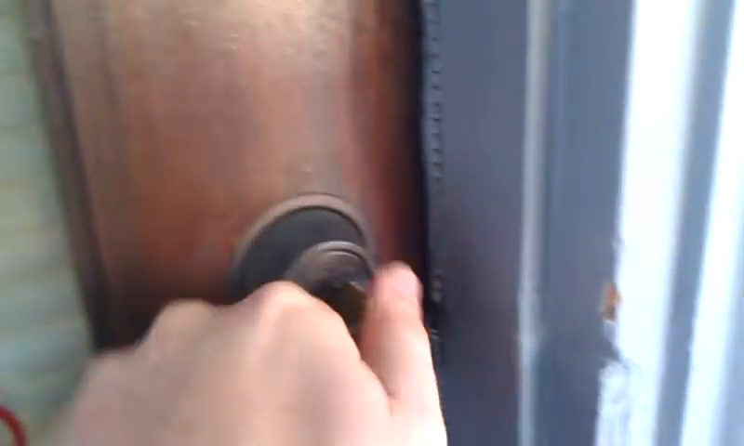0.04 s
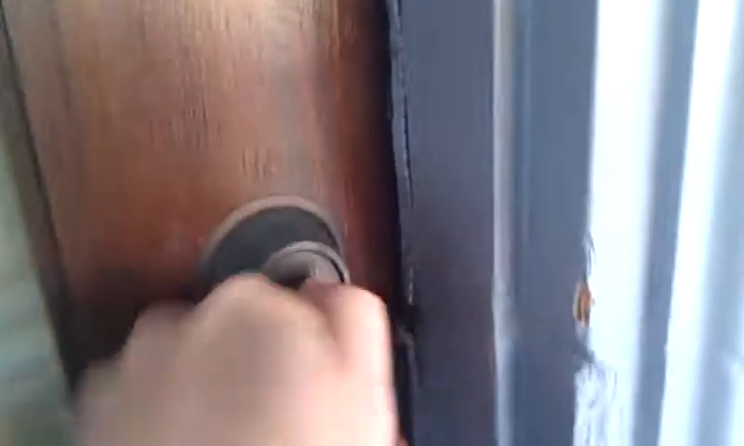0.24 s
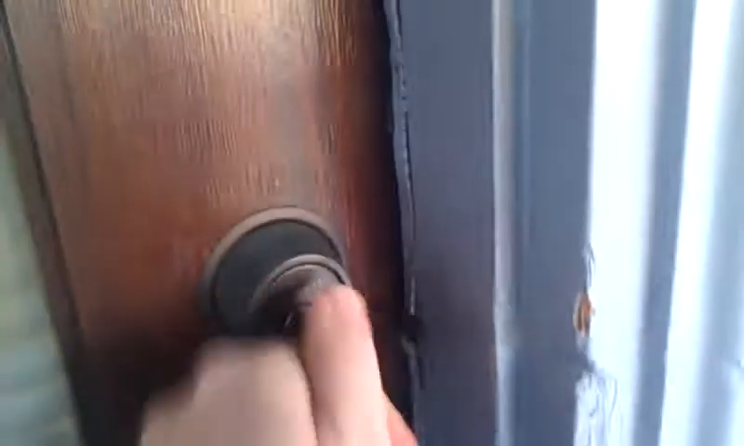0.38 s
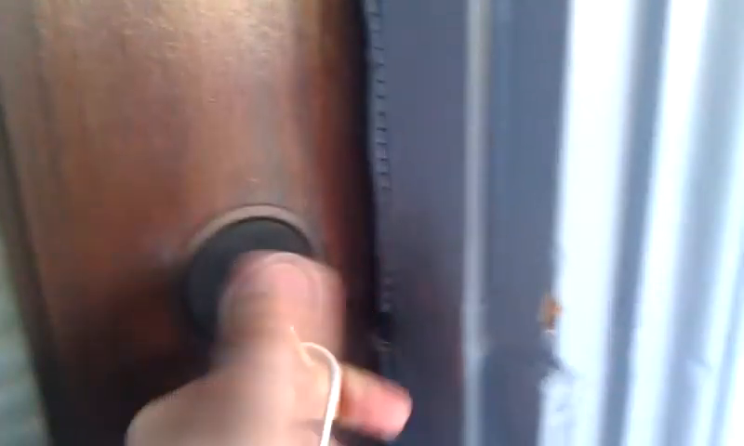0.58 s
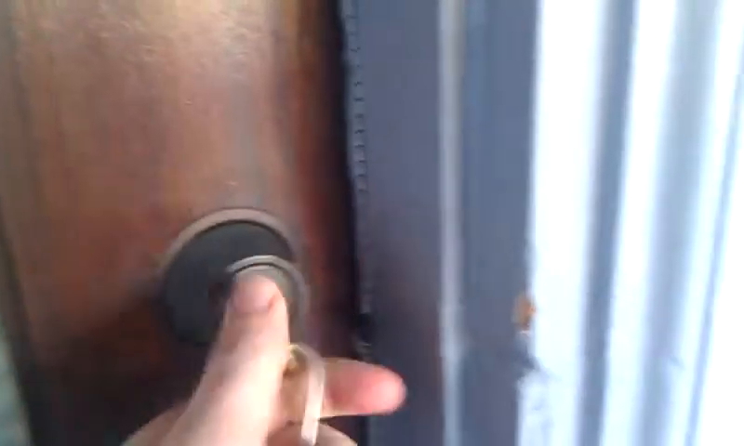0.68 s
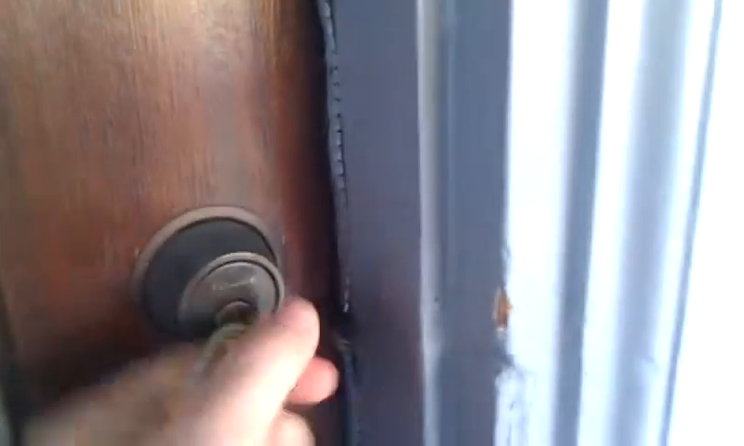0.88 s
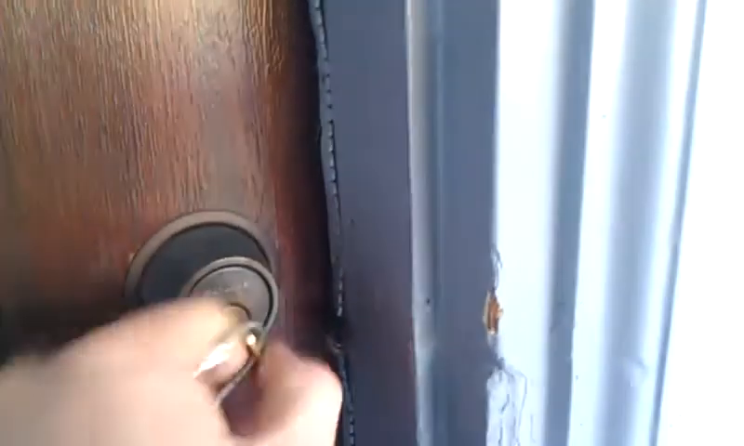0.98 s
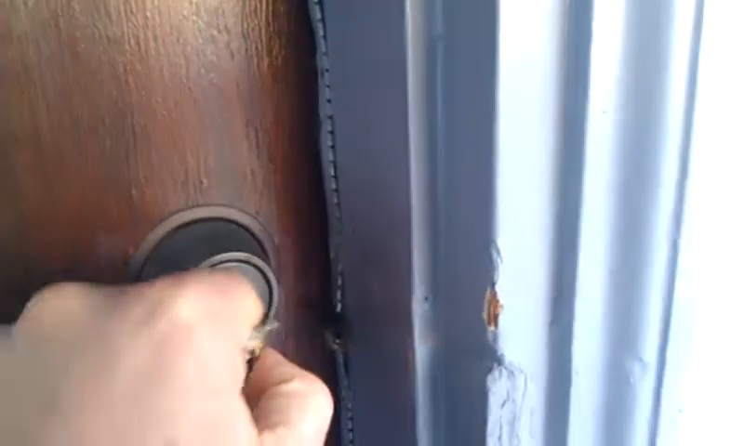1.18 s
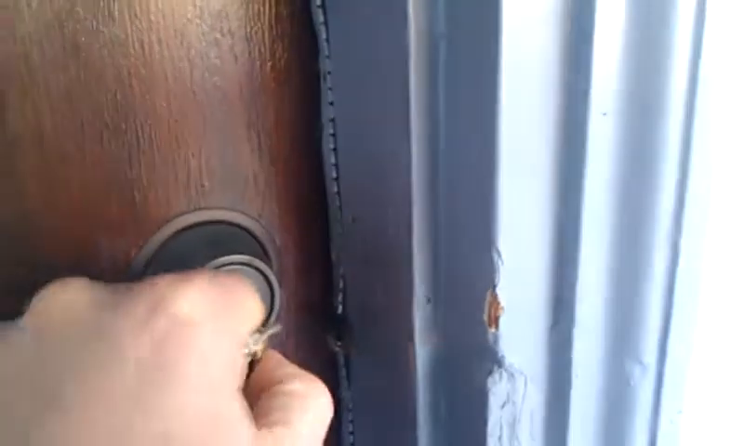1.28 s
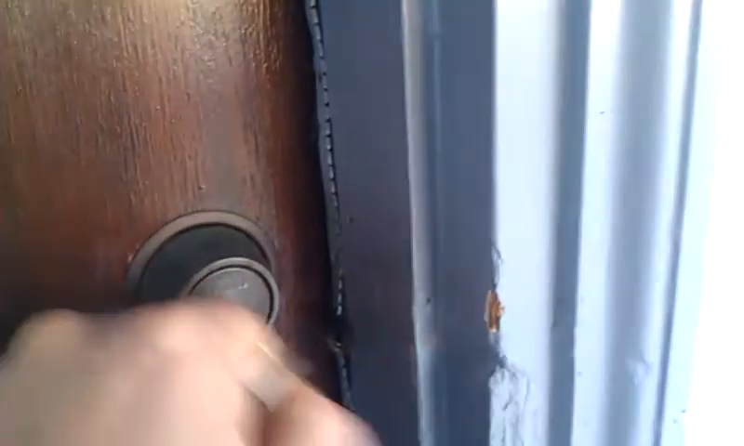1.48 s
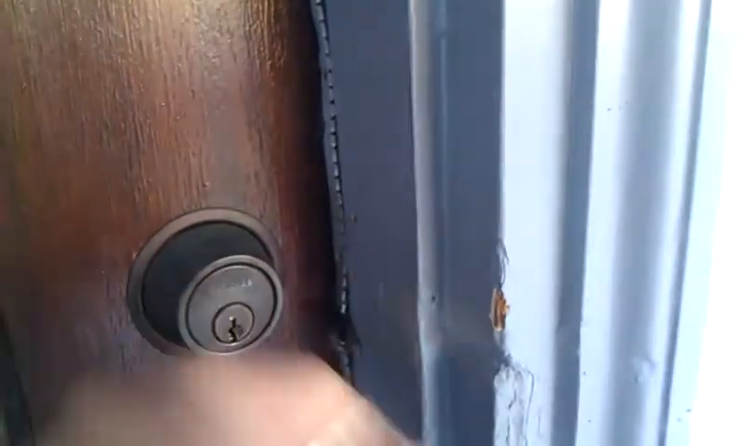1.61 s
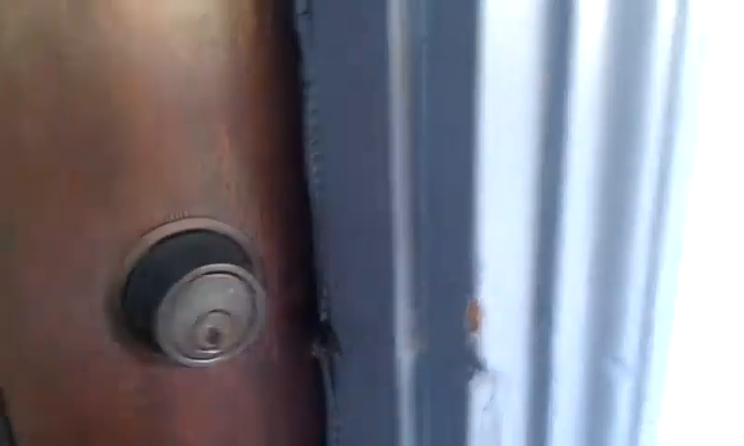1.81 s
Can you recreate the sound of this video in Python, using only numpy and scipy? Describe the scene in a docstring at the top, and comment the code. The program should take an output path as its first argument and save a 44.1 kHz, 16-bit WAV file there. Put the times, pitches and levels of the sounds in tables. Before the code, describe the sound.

A key works a deadbolt in a wooden door, heard close on a phone microphone. Faint rubbing and low rumble lead to a loud bright clack at 0.23 s, with a smaller click at 0.28. Lighter clicks and a soft thud follow at 0.5 and 0.74, then quiet fumbling. At 1.5-1.58 the key scrapes out in rapid metallic ticks; the door thuds softly and keys jingle from 1.75, brightest at the end.

```python
"""Low rumble, the hush of an entrance and faint rubbing come first; then a key is turned in a deadbolt in a
wooden door, turned back and pulled out, close to a phone microphone. Each contact is a short chatter of clicks
that rings the modes of lock, key and door; the pins drop as the key leaves, its blade scrapes out as dense
grains, the keys on the ring jingle and the door thuds softly in its frame. Rumble and hush are banded noise;
allpasses and feedback delays make the room."""
import sys
import numpy as np
from scipy import signal
from scipy.io import wavfile

SR = 44100
rng = np.random.default_rng(int(sys.argv[2]) if len(sys.argv) > 2 else 0)


def nominal_scale(level):
    """Amplitude ratio for a level in decibels (scalar or array-like)."""
    x = np.asarray(level, float) / 20
    return 10 ** x


def log_audio(samples):
    """Write samples as a 16-bit WAV file to the path given in sys.argv[1]."""
    # one column per channel
    frames = np.atleast_2d(samples).T
    # limit to full scale, then quantise
    limited = np.clip(frames, -1, 1)
    pcm = np.round(limited * 32767).astype(np.int16)
    wavfile.write(sys.argv[1], SR, pcm)


N = 81585  # length in samples


def rms_one(x):
    """Scales a signal to rms 1."""
    return x / np.sqrt(np.mean(x ** 2) + 1e-20)


def level(rows):
    """A curve of (s, dB) as gain: silent before it, and after it unless it runs past 1.8 s."""
    s, db = np.transpose(rows)
    after_db = db[-1] if s[-1] > 1.8 else -200
    return nominal_scale(np.interp(np.arange(N) / SR, s, db, left=-200, right=after_db))


def drift(rate):
    """Slow chance of spread 1: noise through two equal one-pole low-passes at rate Hz."""
    every = 40  # samples between drawn points
    pole = np.exp(-2 * np.pi * rate * every / SR)
    noise = rng.standard_normal(N // every + 2002)
    slow = signal.lfilter([1], [1, -2 * pole, pole ** 2], noise)[2000:]
    return np.interp(np.arange(N) / every, np.arange(len(slow)), rms_one(slow))


def banded_noise(spectrum, patchy_db, rate):
    """Third-octave bands of noise that flicker twice as much together as each alone; rms 1."""
    hz, db = np.transpose(spectrum)
    edges = 20 * 2 ** np.arange(0, 9.8, 1 / 3)
    white = rng.standard_normal((2, N + 8000))  # neighbouring bands take different noise
    together = drift(rate)
    out = 0
    for k, (low, high) in enumerate(zip(edges, edges[1:])):
        mid = np.sqrt(low * high)
        if hz[0] < mid < hz[-1]:
            band_pass = signal.butter(2, [low, high], "band", fs=SR, output="sos")
            band = signal.sosfilt(band_pass, white[k % 2])[8000:]
            flicker_db = patchy_db * (2 * together + drift(rate))
            out = out + band * nominal_scale(np.interp(np.log(mid), np.log(hz), db) + flicker_db)
    return rms_one(out)


def ring(clicks, hz, t60):
    """A damped resonator: a unit click sets a sine of height 1 ringing, for at least 2 ms to -60 dB."""
    r = nominal_scale(-60 / (max(t60, .002) * SR))
    w = 2 * np.pi * hz / SR
    return signal.lfilter([0, np.sin(w)], [1, -2 * r * np.cos(w), r * r], clicks + 1e-18)


def strike(modes, s, db, favour_hz=None, width_oct=1., scatter_db=4, most_db=12, lag_cycles=0):
    """Every click rings every mode at its own strength, less those far from the favoured pitch."""
    out = np.zeros(N)
    for k, (hz, mode_db, t60) in enumerate(modes):
        at = np.clip(((s + lag_cycles / hz) * SR).astype(int), 0, N - 1).ravel()
        own_db = scatter_db * rng.standard_normal(s.shape)
        if favour_hz is not None:
            octaves_off = np.log2(hz / favour_hz)
            own_db = own_db - np.minimum(6 * (octaves_off / width_oct) ** 2, most_db)
        sign = rng.choice([-1, 1], s.shape)
        sign[:, 0] = (-1) ** k  # the first click alternates in sign from mode to mode
        heights = nominal_scale(db + mode_db + own_db) * sign
        out += ring(np.bincount(at, heights.ravel(), N), hz, t60)
    return out


def grains(modes, per_s):
    """Friction as dense uneven clicks, each dealt to one mode by chance; rms 1."""
    heights = nominal_scale(2.8 * np.minimum(rng.exponential(1, N), 5))
    happens = rng.random(N) < per_s / SR
    clicks = heights * rng.choice([-1, 1], N) * happens
    dealt = rng.integers(0, len(modes), N)
    out = np.zeros(N)
    for k, (hz, db, t60) in enumerate(modes):
        out += nominal_scale(db) * ring(clicks * (dealt == k), hz, t60)
    return rms_one(out)


def crowded(strength, count):
    """Modes (Hz, dB) spread evenly in pitch, slightly out of line."""
    hz, db = np.transpose(strength)
    crowd = np.geomspace(hz[0], hz[-1], count) * rng.uniform(.98, 1.02, count)
    return zip(crowd, np.interp(np.log(crowd), np.log(hz), db))


def bodies():
    """Modes (Hz, dB, t60 in s) of lock, key and door; the door's low modes ring longest."""
    # Modes of the lock. Each row: pitch in Hz, strength in dB.
    lock_modes = [(4550, -2.5), (4950, 3.5), (5230, 4), (5600, 3.5), (5950, 3.5), (6300, 1), (6650, 4),
                  (7000, 0.5), (7400, -0.5), (8200, -10.5), (8900, -13)]
    # Strength curve of the key's crowded modes. Each row: pitch in Hz, strength in dB.
    key_strength = [(9700, -15), (11800, -8), (13700, -5.5), (15500, -3.5)]
    # Strength curve of the door's crowded modes. Each row: pitch in Hz, strength in dB.
    door_strength = [(480, -17), (620, -7), (760, -17), (910, -7), (1060, -13), (1250, -3), (2400, -5),
                     (3100, -1), (4300, 0)]
    lock = [(hz, db, 0.021) for hz, db in lock_modes]
    key = [(hz, db, 0.0071) for hz, db in crowded(key_strength, count=12)]
    door = [(hz, db, 0.038 * np.sqrt(1000 / hz)) for hz, db in crowded(door_strength, count=26)]
    return lock, key, door


def rumble():
    """Low noise with a hum that wavers, since noise drives its resonator."""
    # Loudness of the rumble. Each row: time in seconds, level in dB.
    rumble_level = [(0, -63.5), (.21, -64), (.25, -48), (.39, -57.5), (.48, -59.5), (.53, -52.5),
                    (.73, -59.5), (.92, -59.5), (1.05, -55.5), (1.15, -58), (1.5, -61), (1.595, -39.5),
                    (1.67, -54), (1.73, -46), (1.82, -59), (1.85, -47)]
    # Spectrum of the rumble. Each row: frequency in Hz, relative density in dB per Hz.
    rumble_colour = [(13, -35), (22, -9.5), (65, 4), (178, -1.5), (237, -5.5), (500, -11), (650, -40)]
    hum = rms_one(ring(rng.standard_normal(N), hz=60.2, t60=0.066))
    noise = banded_noise(rumble_colour, patchy_db=1.52, rate=6.4)
    return level(rumble_level) * (noise + nominal_scale(-11.5) * hum)


def hush():
    """The soft wide noise of the entrance, rising and sinking."""
    # Loudness of the hush. Each row: time in seconds, level in dB.
    hush_level = [(0, -65), (.33, -56.5), (.48, -65.5), (.62, -65.5), (.82, -59), (1.19, -65), (1.42, -71),
                  (1.66, -58.5), (1.85, -56)]
    # Spectrum of the hush. Each row: frequency in Hz, relative density in dB per Hz.
    hush_colour = [(150, -37), (250, -2), (450, -9.5), (1000, -6.5), (2100, -10), (4050, -16),
                   (6200, -10.5), (9010, -25.5), (16000, -22)]
    return level(hush_level) * banded_noise(hush_colour, patchy_db=1.0, rate=10)


def entrance(x):
    """Three short allpasses smear the sound; ten feedback delays, duller on every round, prolong it."""
    t60_s, wall_cut_hz = 0.29, 10100
    for lag in (37, 89, 173):  # samples
        b = np.r_[-.65, np.zeros(lag - 1), 1]
        x = signal.lfilter(b, b[::-1], x + 1e-18)
    dull = np.exp(-2 * np.pi * wall_cut_hz / SR)
    lags = (rng.uniform(.004, .022, 10) * SR).astype(int)
    out = np.zeros(N)
    for k, lag in enumerate(lags):
        loop, state = x.copy(), [0.]
        gain = nominal_scale(-60 * lag / SR / t60_s)
        for i in range(lag, N, lag):
            back, state = signal.lfilter([gain * (1 - dull)], [1, -dull], loop[i - lag:i], zi=state)
            loop[i:i + lag] += back[:N - i]
        out += (loop - x) * (-1) ** k
    return out


def thuds():
    """The door shifts in its frame: a soft push rings three neighbouring low modes."""
    # Each row: time in seconds, push in dB before softening, pitch of the middle mode in Hz.
    shifts = [(0.511, -41, 318), (1.022, -45, 280), (1.584, -40.5, 150), (1.744, -43, 180)]
    out = np.zeros(N)
    for s, db, hz in shifts:
        push = np.zeros(N)
        push[int(s * SR)] = nominal_scale(db)
        t60 = 18.5 / hz  # 18.5 cycles of the middle mode
        for ratio, gain in ((.75, .5), (1, -1), (1.3, .8)):
            out += gain * ring(push, hz * ratio, t60)
    return signal.lfilter([.0036], [1, -1.88, .8836], out)  # two one-pole low-passes near 430 Hz


def rubbing(lock, door):
    """Fingers and key rub, faint and uneven: grains mostly low in the door, some in the lock."""
    # Fingers and key heard through the door. Each row: time in seconds, level in dB before the band-pass.
    rub_level = [(0, -55.5), (.05, -54.5), (.12, -71), (.19, -53), (.34, -57), (.72, -64.5), (.82, -52),
                 (.9, -66), (1.0, -54.5), (1.15, -66.5), (1.335, -67), (1.37, -51.5), (1.455, -53.5),
                 (1.49, -70), (1.6, -54.5), (1.85, -64)]
    # Edges of the dull band: low in Hz, high in Hz.
    rub_band = (570, 1407)
    per_s = 6000
    band_pass = signal.butter(2, rub_band, "band", fs=SR, output="sos")
    dull = signal.sosfilt(band_pass, grains(door, per_s))
    uneven = nominal_scale(drift(23))
    return level(rub_level) * uneven * (dull + nominal_scale(-10) * grains(lock, per_s))


def jingles(key, count=8):
    """Loose keys touch: a firm click and a run of faint ones ring long modes, with a dry rattle."""
    # Touches on the ring. Each row: start in seconds, level in dB, favoured pitch in Hz.
    touches = [(1.752, -61, 14915), (1.766, -60, 11120), (1.776, -57, 6815), (1.8015, -48, 11120),
               (1.811, -52, 7000), (1.8450, -27.5, 13800)]
    # Long modes of the loose keys. Each row: pitch in Hz, strength in dB, t60 in seconds.
    loose_keys = [(6815, 0, .11), (7530, -5, .08), (11120, 0, .1), (14915, 0, .14)]
    s, db, hz = np.transpose(touches)[:, :, None]
    faint = np.arange(count) > 0
    s = s + .022 * faint * rng.random((len(s), count))
    db = db - 11 * faint
    tones = strike(loose_keys, s, db, hz, width_oct=.3, scatter_db=2, most_db=24)
    rattle = strike(key, s, db - 12)
    return tones + rattle


def scrape(lock, key, door):
    """The key blade scrapes out past the pins: dense grains in lock, key and door."""
    # Loudness of the scrape in the lock. Each row: time in seconds, level in dB.
    scrape_level = [(1.498, -52), (1.506, -47.5), (1.525, -37), (1.545, -42.5), (1.575, -37), (1.59, -71),
                    (1.62, -60)]
    per_s = 4900
    mix = grains(lock, per_s)
    mix += nominal_scale(-6) * grains(key, per_s)
    mix += nominal_scale(-6.5) * grains(door, per_s)
    return level(scrape_level) * mix


def contacts(lock, key, door, count=24):
    """One firm click and a dying chatter of tiny ones; the door answers later. Returns lock, rest."""
    # Contacts of key, pins and bolt. Each row: start in seconds, level in dB before the offset of each body,
    # pitch the lock favours in Hz, key and door in dB over that level before theirs, chatter time in seconds.
    touches = [(0.1362, -39, 5930, -3.5, -8.5, 0.0011), (0.2006, -37.5, 6140, -15, -4.5, 0.0023),
               (0.225, -22.5, 5540, -6, -6, 0.0014), (0.2283, -14, 6020, -9, -8.5, 0.0019),
               (0.2317, -4, 5370, -14, -24.5, 0.0014), (.2380, -28, 6300, -3, 2.5, 0.0066),
               (0.2764, -19.5, 6430, -13.5, -17, 0.006), (0.503, -30, 4570, -28, -13.5, 0.0044),
               (0.65, -47, 6100, -7, -3, 0.0033), (0.7337, -36, 6160, -12.5, -13.5, 0.00064),
               (0.7447, -24, 6460, -18.5, -13, 0.004), (0.7555, -40, 5530, 3, -10, 0.0032),
               (1.0142, -36.5, 4710, -39.5, -9.5, 0.0034), (1.109, -45, 6000, -14.5, -9.5, 0.0024),
               (1.181, -44.5, 5700, -1, -6.5, 0.0026), (1.2178, -48, 6220, -10, -13, 0.0019),
               (1.248, -45.5, 5900, -8.5, -13.5, 0.0035), (1.2851, -46.5, 5930, -11, -13.5, .002),
               (1.345, -68, 6330, -22, 7, 0.0038), (1.367, -53.5, 6150, -30, -1, 0.0042),
               (1.385, -55, 6100, -3, -3, 0.0022), (1.4142, -32, 5930, -23, -16, .002),
               (1.4190, -40.5, 5000, -11, -12, .002), (1.4406, -43, 5200, -5.5, -13, 0.0014),
               (1.5083, -21, 6570, -4.5, -17, 0.00072), (1.5215, -23, 5520, 3, -21, 0.00099),
               (1.532, -26, 6980, 0, -17, 0.00091), (1.5392, -23.5, 6550, 5, -9.5, 0.0018),
               (1.5580, -18, 6610, 5, -15, 0.00067), (1.5631, -24, 6700, -5, -9.5, 0.0011),
               (1.5690, -27.5, 4660, -18, -7.5, 0.0038), (1.6628, -43, 5850, -11, -29, 0.0023),
               (1.6922, -35.5, 6300, -14, -8.5, 0.0049), (1.7985, -42, 5520, 10.5, -12, 0.0023),
               (1.827, -38.5, 5140, -21, -4.5, 0.0042)]
    lock_db, key_db, door_db, firm_db = -16, -10, -13.5, 5  # firm: first click over the chatter
    s, db, hz, key_extra_db, door_extra_db, chatter = np.transpose(touches)[:, :, None]
    late = (np.arange(count) + rng.random((len(s), count))) * 3.5 / count  # in chatter times
    when = chatter * late
    first = np.arange(count) == 0
    size_db = np.where(first, firm_db, 1.5 * rng.standard_normal(late.shape))
    db = db - 9.32 * late + size_db

    lock_sound = strike(lock, s + when, db + lock_db, hz, width_oct=0.087)
    key_sound = strike(key, s + when, db + key_extra_db + key_db)
    # the door chatters 2.5 times longer, without the firm click, and each mode answers 3 cycles late
    wood_db = db - firm_db * first + door_extra_db + door_db
    wood = strike(door, s + 2.5 * when, wood_db, lag_cycles=3)
    low_cut = signal.butter(2, 250, "high", fs=SR, output="sos")
    return lock_sound, key_sound + signal.sosfilt(low_cut, wood)


def scene():
    """Rumble and hush below, rubbing, then lock, key and door close by with a little of the room."""
    lock, key, door = bodies()
    background = rumble() + hush()
    clicks, near = contacts(lock, key, door)
    near += scrape(lock, key, door) + jingles(key) + thuds()
    into_room = near + nominal_scale(-2.5) * clicks  # the lock is heard close, less through the room
    room = nominal_scale(-25) * entrance(into_room)
    mix = clicks + near + room + rubbing(lock, door) + background
    return mix[None]


def band_limit(x):
    """A steep low-pass at the top of the band."""
    return signal.sosfilt(signal.butter(12, 16850, fs=SR, output="sos"), x)


def record(dry):
    """A steep low-pass cuts the top, 40 dB down from 16.6 kHz."""
    top_cut = signal.cheby2(10, 40, 16600, fs=SR, output="sos")
    mix = signal.sosfilt(top_cut, dry)
    return band_limit(mix)


dry = scene()
out = record(dry)
log_audio(out)
```